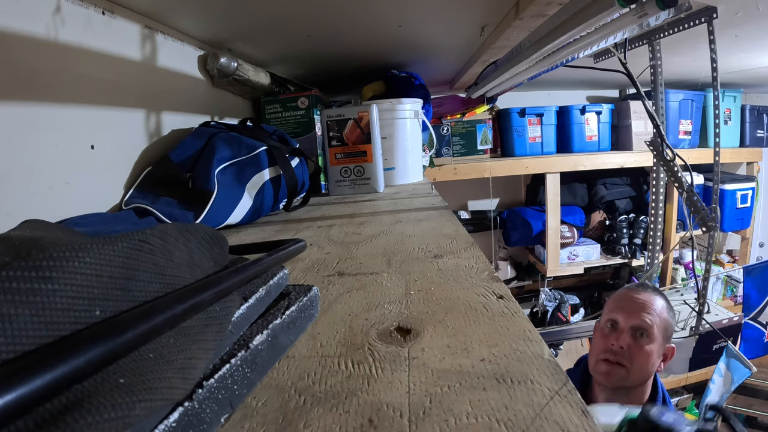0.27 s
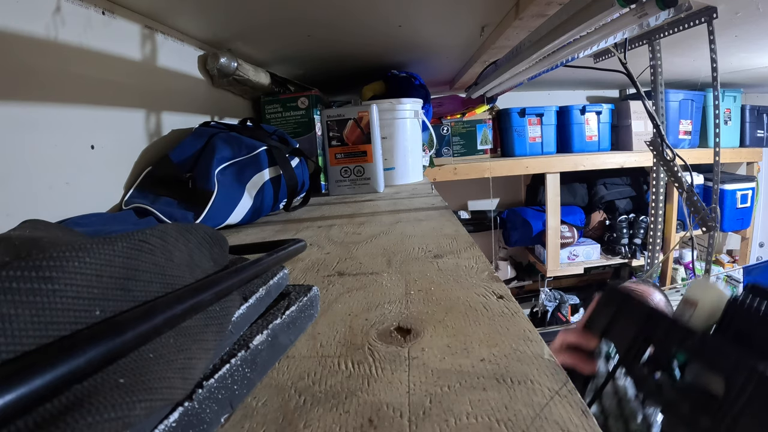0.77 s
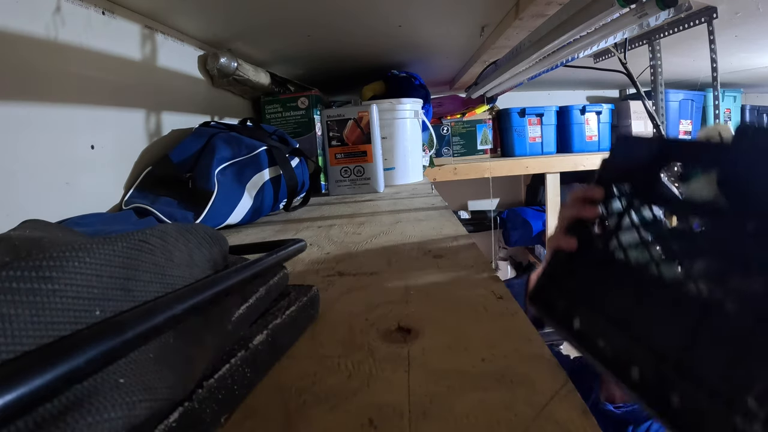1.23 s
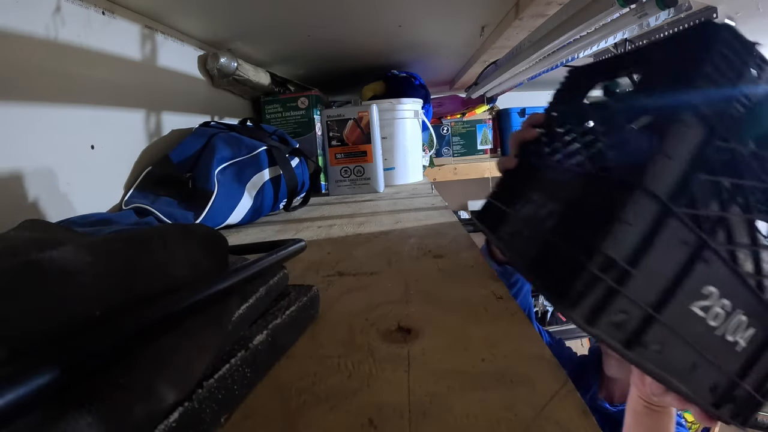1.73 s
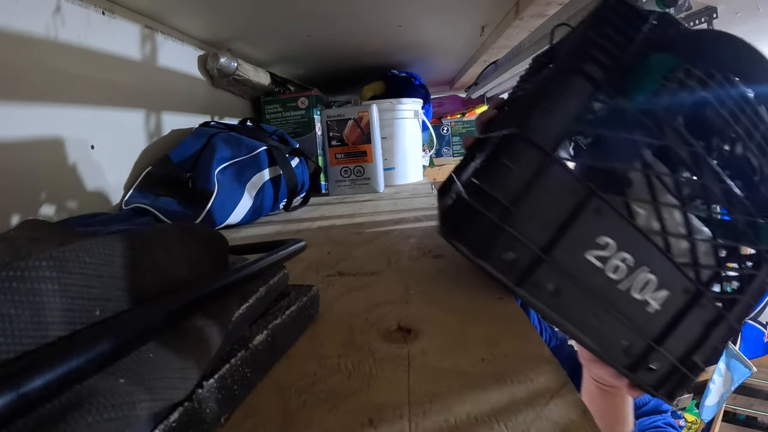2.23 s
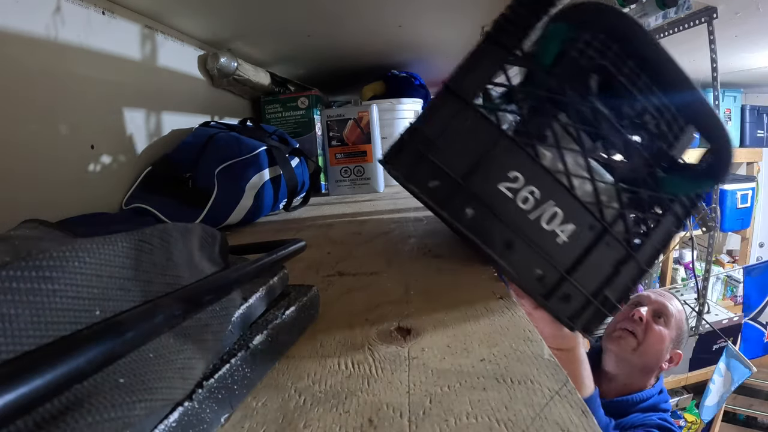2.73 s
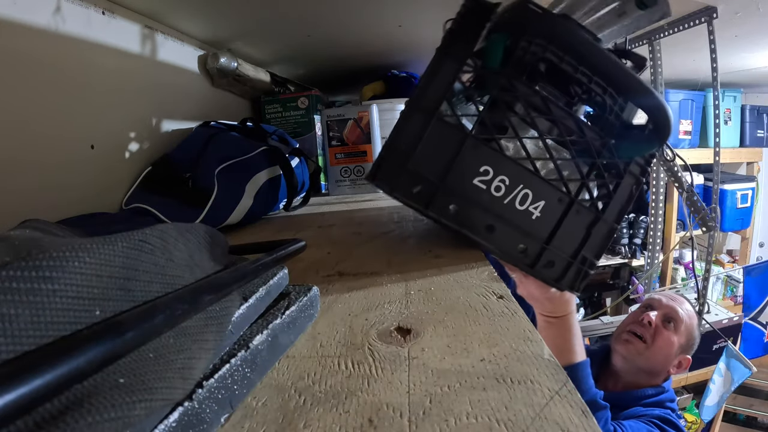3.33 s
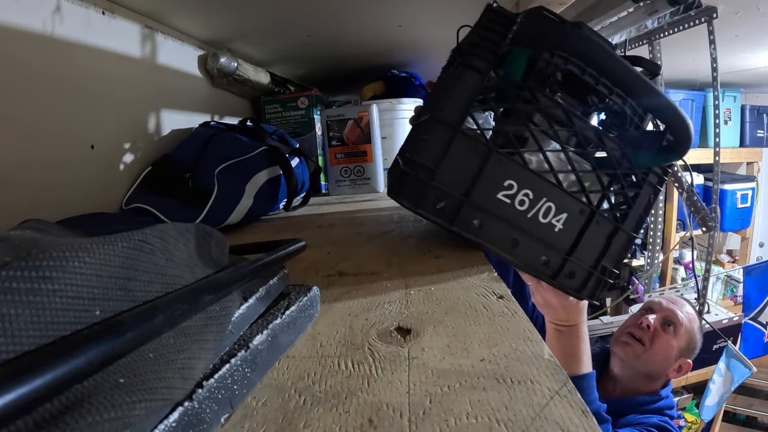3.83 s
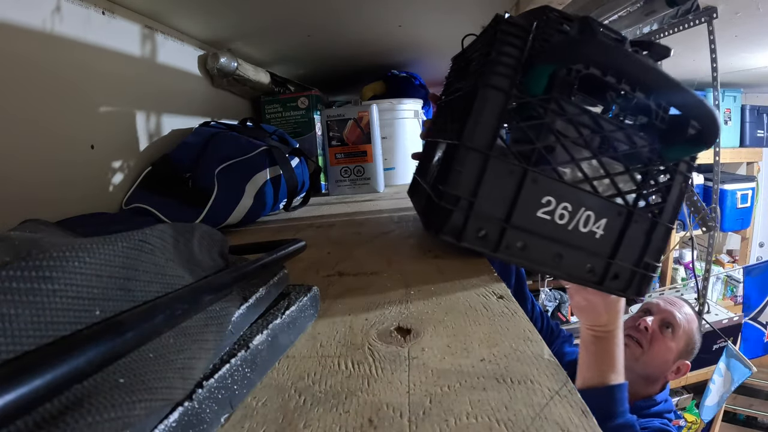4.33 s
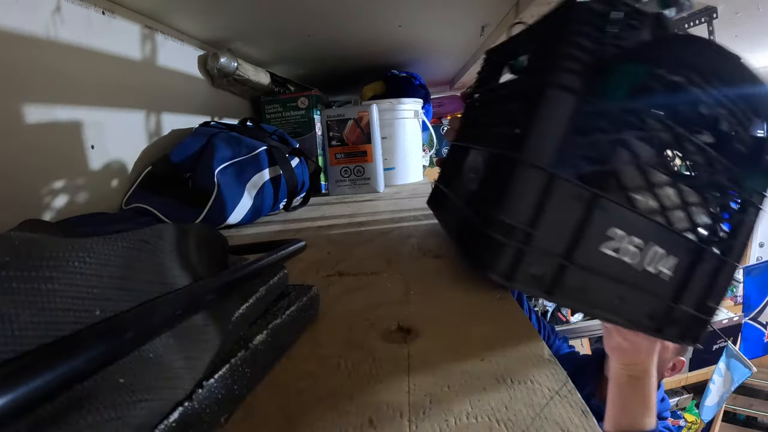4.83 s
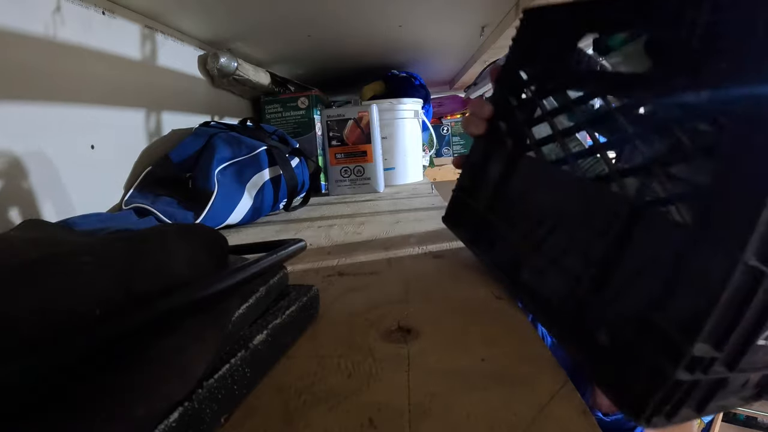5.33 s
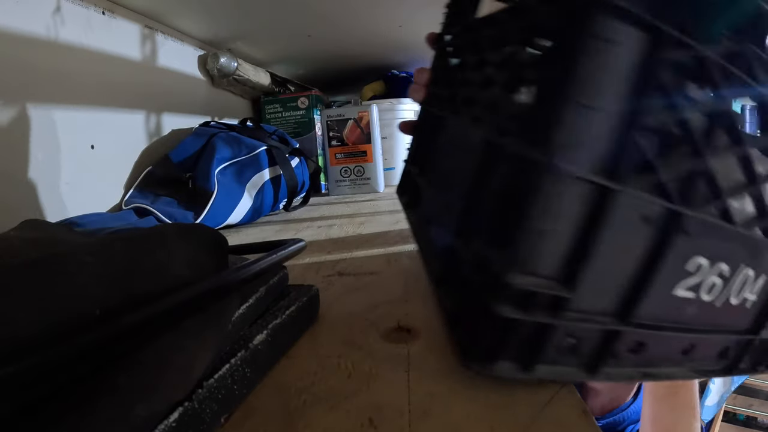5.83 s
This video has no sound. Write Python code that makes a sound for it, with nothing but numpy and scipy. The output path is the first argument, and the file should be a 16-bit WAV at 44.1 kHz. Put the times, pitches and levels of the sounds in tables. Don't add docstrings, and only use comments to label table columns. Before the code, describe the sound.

In a small garage, a loaded plastic crate is lifted with faint shuffling and small ticks from its contents. It bumps onto a plywood shelf, then drags along the wood in rough, stuttering scrapes with hollow panel booms, creaks and sharp snaps. The dragging grows loud, ends in heavy low knocks, and the crate rocks and settles almost quietly. The microphone lies close on the same board, so thumps are deep and solid.

```python
import sys
import numpy as np
from scipy import signal
from scipy.fft import rfft, irfft, next_fast_len
from scipy.io import wavfile
from scipy.ndimage import uniform_filter1d, map_coordinates

SR = 44100
rng = np.random.default_rng(int(sys.argv[2]) if len(sys.argv) > 2 else 0)


def digitize_waveform(pressure):
    field = np.atleast_2d(pressure).T
    bounded = np.clip(field, -1, 1)
    quanta = np.round(bounded * 32767).astype(np.int16)
    wavfile.write(sys.argv[1], SR, quanta)


def nominal_scale(level):
    x = np.asarray(level, float) / 20
    return 10 ** x


N = 268569


def unit(x):
    return x / np.sqrt(np.mean(x ** 2) + 1e-20)


def along(points, hz):
    f, v = np.transpose(points)
    return np.interp(np.log(hz + 1), np.log(f + 1), v)


def curves(rows):
    s, *columns = np.transpose(rows)
    t = np.arange(N) / SR
    return [np.interp(t, s, column, -120, -120) for column in columns]


def wobble(rate):
    knots = rng.standard_normal(int(N / SR * 400))
    return map_coordinates(knots, [np.arange(N) * rate / SR])


def filtered(x, response):
    m = next_fast_len(x.shape[-1] + SR // 4)
    return irfft(rfft(x, m) * response(np.fft.rfftfreq(m, 1 / SR)), m)[..., :x.shape[-1]]


def body(force, modes):
    def ring(f):
        total = 0
        for k, (centre, width, db) in enumerate(modes):
            damping = 1j * f * width
            total = total + (-1) ** k * nominal_scale(db) * damping / (centre * centre - f * f + damping)
        return total
    scale = np.sqrt(np.mean(np.abs(ring(np.linspace(0, SR / 2, 8192))) ** 2))
    return filtered(force, ring) / scale


def loaded(force, modes, centre_hz, octaves):
    share = []
    for hz, _, db in modes:
        distance = np.log2(hz / centre_hz) / octaves
        share.append(nominal_scale(db) * (0.13 + np.exp(-distance ** 2)))
    total = np.sqrt(np.sum(np.square(share), axis=0))
    return sum(body(force * g / total, [(hz, w, 0)]) for g, (hz, w, _) in zip(share, modes))


def add_at(out, start_s, sound):
    out[round(start_s * SR):][:len(sound)] += sound


def swings(rows, rise_s):
    out, t = np.zeros(N + SR), np.arange(SR // 4) / SR
    for s, db, hz, t60_ms in rows:
        shape = (1 - np.exp(-t / rise_s)) * nominal_scale(-60000 * t / t60_ms)
        add_at(out, s - .003, nominal_scale(db + 3.5) * shape * np.sin(2 * np.pi * hz * t))
    return out[:N]


# f/Hz, width/Hz, level/dB
LATTICE_MODES = [(635, 440, -10), (838, 48, 0), (1170, 232, -0.5), (1448, 353, 0.5), (1827, 408, 0),
                 (2409, 690, 2.5), (2639, 625, 3), (3760, 1180, -8.5)]
DUST_MODES = [(4477, 220, 3), (4560, 410, -0.5), (6300, 4100, -9.5), (11920, 1800, -14.5)]
PANEL_MODES = [(290, 33, 5), (430, 53, -63), (460, 46, -4.5), (542, 76, -7), (553.8, 17.4, -3.5)]
BOARD_MODES = [(62, 11, -29), (80.6, 7.7, 7), (98.8, 5, 8.5), (128.2, 13, -1), (165, 53, 2.5),
               (206, 44, -2), (242, 31, -2.5), (299.4, 9.5, 7.5)]


def crate():
    rasp, fizz, hum, rumble, board_hz = forces()
    grain = patchy(grit(spread_db=2.0, clump_db=2.0, clump_rate=130), depth_db=2.8)
    airborne = body(rasp * grain, LATTICE_MODES) + body(fizz * grain, DUST_MODES)
    airborne += ribs()
    airborne += ticks()
    airborne += nominal_scale(-9.5) * rasp * snags(rate=450, cycles=7.4, spread_db=6.5)
    panel_force = hum * grit(spread_db=2.5, clump_db=2.2, clump_rate=54)
    airborne += loaded(panel_force, PANEL_MODES, centre_hz=478, octaves=.22)
    airborne += judder()
    board_force = rumble * grit(spread_db=1.5, clump_db=3.0, clump_rate=37)
    board = loaded(board_force, BOARD_MODES, board_hz, octaves=0.75) + thumps()
    airborne += booms() + taps() + rub()
    return airborne, board


# t/s, speed as rasp level/dB,
# weight on the feet level/dB, contact place [0 mid-span - 1 near a brace]
LIFT = [
    (0.0, -56.5, -6.5, 0.71),
    (0.08, -63, -4, 0.92),
    (0.16, -54, -14, 0.75),
    (0.25, -65, 1, 0.58),
    (0.33, -53, -8.5, 0.78),
    (0.86, -59.5, -13.5, 0.88),
    (1.1, -56.5, -7.5, 0.56),
    (1.3, -68.5, -2, 0.68),
    (1.66, -69.5, -2, 0.23),
        (1.77, -73, 2, .3),
    (1.79, -63.5, -5, .3),
    (1.86, -64, -3, .3),
    (1.89, -65, 4, .3),
]
LANDING = [
    (1.91, -59, -4, 0.42),
    (2.03, -64, 17.5, 0.25),
    (2.1, -72, 13, 0.28),
    (2.3, -64, 17, 0.14),
    (2.39, -50.5, 16, 0.6),
    (2.43, -55, 8, 0.25),
    (2.49, -66, 24, 0.16),
]
FIRST_PUSH = [
    (2.55, -47, 1, 0.66),
    (2.66, -36, -4.5, 0.55),
    (2.75, -45.5, 1, 0.34),
    (2.97, -35.5, -1.5, 0.48),
    (3.04, -41, 0.5, 0.5),
    (3.26, -39, 5, 0.69),
    (3.36, -33, -5.5, 0.38),
    (3.46, -44, -7.5, 0.99),
]
LURCH = [
    (3.539, -25.5, -11, 0.92),
    (3.588, -30, -11, 0.77),
    (3.61, -23.5, -16, 0.63),
    (3.66, -26, -23, 0.84),
    (3.69, -34, -8.5, 0.54),
    (3.76, -37, 2.5, 0.41),
    (3.869, -47.5, -2, 0.22),
    (3.908, -45, 2, .3),
    (3.925, -39, -1.5, 0.37),
]
LAST_PUSH = [
    (4.0, -33.5, -6.5, 0.35),
    (4.16, -42, -4, 0.11),
    (4.27, -36, 0.5, 0.53),
    (4.45, -30, -9, 0.8),
    (4.56, -33.5, -4.5, 0.42),
    (4.69, -29, -7, 0.67),
    (4.82, -35.5, 4.5, 0.27),
    (4.99, -30.5, -1, 0.71),
    (5.11, -47.5, 0, 0.2),
]
TIPPING = [
    (5.13, -55, 6, .3),
    (5.16, -50, 4, .4),
    (5.185, -53, 6, .4),
    (5.197, -41, 5.7, .5),
]
SETTLE = [
    (5.211, -43.5, 6, 0.62),
    (5.289, -68, 15, 0.18),
    (5.43, -70.5, 16, 0.086),
    (5.63, -67, 14.5, 0.046),
    (5.72, -68.5, 10.5, .05),
    (5.78, -57.5, 6, 0.84),
    (5.87, -62, 14, 0.074),
    (5.95, -58, 0, 0.034),
    (6.09, -47, -1, 0.17),
]


def motion():
    hands = LIFT + LANDING + FIRST_PUSH + LURCH + LAST_PUSH + TIPPING + SETTLE
    rasp_db, weight_db, place = curves(sorted(hands))
    t = np.arange(N) / SR
    lifted = t < LANDING[0][0]
    sliding = t > FIRST_PUSH[0][0]
    rocking = t > LAST_PUSH[-1][0]
    braced = (t > 4.93) * (t < 5.99)
    fizz_db = 1.065 * (rasp_db + 41) - 53.5 + 5 * lifted
    fizz_db = fizz_db - 0.29 * np.maximum(weight_db, 0) - 14 * braced
    hum_db = rasp_db + 1.15 * weight_db - 1.5 - 2.5 * lifted
    hum_db = hum_db - 11 * rocking - 22 * ~(lifted | sliding)
    rumble_db = rasp_db + weight_db - 2 + 3 * lifted
    board_hz = 100 * 2 ** (1.61 * np.clip(place, 0, 1))
    return rasp_db, fizz_db, hum_db, rumble_db, board_hz


# t/s, peak level/dB, ringing rib f/Hz, board level/dB, contact time/ms
BUMPS = [(1.9026, -20.5, 1220, -10, 38), (1.987, -31, 2280, -2, 49), (2.239, -34, 1170, 8.5, 28),
         (2.339, -24.5, 1190, -3, 47), (2.434, -16, 1220, -5.5, 17.4), (2.456, -24.5, 1190, 4, 31),
         (2.481, -30, 1540, -3, 18), (2.511, -24, 1290, -1, 32), (2.621, -28.5, 1170, 6.5, 33),
         (2.652, -16.5, 1240, -8, 4.5), (2.702, -24.5, 1170, -4, 85), (5.01, -16.5, 1710, 0.5, 6),
         (5.037, -25.5, 1170, -3, 14), (5.143, -33, 1160, -11, 9.1), (5.173, -30, 1410, -20, 34),
         (5.241, -31, 956, 13.5, 13), (5.302, -51, 1200, 4, 41), (5.459, -22.5, 2303, -4.5, 22.4),
         (5.55, -33, 1900, -18, 14.4), (5.741, -44, 1480, -13, 30), (5.787, -27.5, 1260, -3.5, 47),
         (5.92, -32, 1840, 0.5, 50), (6.008, -34, 1310, -7.5, 42)]
# t/s, peak level/dB, ringing rib f/Hz, panel level/dB, contact time/ms
SLIPS = [(2.868, -34.5, 1200, 8, 22), (2.899, -21.5, 2160, -3, 21), (3.094, -24, 1200, 1, 61),
         (3.322, -16.5, 1900, -16, 33), (3.426, -23.5, 1300, -32, 66), (3.545, -17, 1130, -8, 38),
         (3.599, -14.5, 900, -15.5, 92), (3.64, -18.5, 1700, -24, 16), (3.916, -34.5, 820, 4, 38),
         (4.072, -25.5, 790, 4, 5.5), (4.258, -20, 1130, -16, 19), (4.338, -36, 1370, -14, 8),
         (4.374, -15.5, 1350, -18, 61), (4.574, -30.5, 1130, 4, 49), (4.661, -18.5, 1350, -7, 37),
         (4.691, -12.5, 1360, -12, 33), (4.75, -19, 1260, -2.5, 21), (4.806, -11.5, 970, -30, 25),
         (4.833, -11.5, 895, -15, 16), (4.861, -13.5, 1470, -25, 51)]


def contacts(db, bite_s, fall_s):
    force, t = np.zeros(N + SR), np.arange(SR // 4) / SR
    for (s, *_, hold_ms), level in zip(BUMPS + SLIPS, db):
        released = np.maximum(t - hold_ms / 1000, 0)
        shape = (1 - np.exp(-t / bite_s)) * nominal_scale(-60 * released / fall_s - 60 * t / .5)
        add_at(force, s - .003, (nominal_scale(level) * shape) ** 2)
    return np.sqrt(force[:N])


def forces():
    rasp_db, fizz_db, hum_db, rumble_db, board_hz = motion()
    s, peak_db, _, share_db, _ = np.transpose(BUMPS + SLIPS)
    bump = np.arange(len(peak_db)) < len(BUMPS)
    panel_db = peak_db + np.where(bump, -12.5 - 5.5 * (s > SETTLE[1][0]), share_db)
    board_db = peak_db + np.where(bump, share_db, -17.5)
    surge = .7 * np.tanh(wobble(22))
    slips = contacts(peak_db - 10.5, bite_s=0.0035, fall_s=0.072)
    bright_slips = nominal_scale(-8.5) * slips * (slips / nominal_scale(-31.5)) ** 0.19
    panel_hits = contacts(panel_db - 6.5, bite_s=0.0064, fall_s=0.12)
    board_hits = contacts(board_db - 6.0, bite_s=0.005, fall_s=0.16)
    rasp = np.hypot(nominal_scale(rasp_db + 2.54 * surge), slips)
    fizz = np.hypot(nominal_scale(fizz_db + 0.98 * surge), bright_slips)
    hum = np.hypot(nominal_scale(hum_db + 1.1 * surge), panel_hits)
    rumble = np.hypot(nominal_scale(rumble_db + 0.87 * surge), board_hits)
    return rasp, fizz, hum, rumble, board_hz


def grit(spread_db, clump_db, clump_rate):
    sizes = nominal_scale(spread_db * rng.exponential(size=N) + clump_db * wobble(clump_rate))
    return unit(rng.standard_normal(N) * sizes)


def patchy(x, depth_db):
    z = signal.stft(x, nperseg=768)[2]
    field = uniform_filter1d(rng.standard_normal(z.shape), size=2, axis=0)
    field = uniform_filter1d(field, size=5, axis=1)
    return unit(signal.istft(z * nominal_scale(depth_db * unit(field)), nperseg=768)[1][:N])


def snags(rate, cycles, spread_db):
    when, pitch, size = rng.random((4000, 3))[:int(rate * N / SR)].T
    hz = (1400 * 2 ** (1.9 * pitch))[:, None]
    t = np.arange(SR // 50) / SR
    level = nominal_scale(-spread_db * np.log(size + 0.027))[:, None] * 1000 / hz
    rings = level * np.sin(2 * np.pi * hz * t) * np.exp(-t * hz / cycles)
    place = (when * N).astype(int)[:, None] + np.arange(len(t))
    return unit(np.bincount(place.ravel(), rings.ravel(), N + SR)[:N])


def ribs():
    out, t = np.zeros(N + SR), np.arange(SR // 8) / SR
    for s, db, hz, *_ in BUMPS + SLIPS:
        noise = rng.standard_normal((2, len(t)))
        ring = body(noise[0] * nominal_scale(-60 * t / 0.068), [(hz, 60, 0)])
        crack = 0.47 * body(noise[1] * nominal_scale(-60 * t / 0.049), LATTICE_MODES)
        add_at(out, s - .003, nominal_scale(db - 12.0) * (ring + crack))
    return out[:N]


# t/s, level/dB, pressed share [0-1]
JUDDER = [
    (3.53, -52, 1),
    (3.585, -32, 0.7),
    (3.6, -19.5, 0.81),
    (3.625, -23.5, 0.8),
    (3.65, -28.5, 0.2),
    (3.675, -38, 0),
    (3.7, -39, 0.5),
    (3.73, -60, 0.2),
]
# f/Hz, width/Hz, level/dB
PRESSED_MODES = [(869, 30, 4.5), (1044, 26, -20), (1820, 23, -1), (2140, 47, -4), (2650, 35, -17)]
EASED_MODES = [(395.4, 20, 1), (822, 15, 3.5), (1290, 77, -9), (1624, 49, -3)]


def judder():
    judder_db, pressed = curves(JUDDER)
    pressed = np.clip(pressed, 0, 1)
    force = nominal_scale(judder_db + 5.5) * grit(spread_db=1.0, clump_db=5.5, clump_rate=77)
    return body(force * np.sqrt(pressed), PRESSED_MODES) + body(force * np.sqrt(1 - pressed), EASED_MODES)


# t/s, peak
# level/dB, f/Hz, t60/ms
THUMPS = [(0.204, -42.5, 202, 67), (0.208, -50.5, 112, 77), (0.33, -44.5, 104, 110), (1.05, -55, 98, 120),
          (1.93, -26, 155, 100), (2.24, -33.5, 290, 180), (2.285, -31, 84, 71), (2.365, -22.5, 222, 92),
          (2.45, -21, 119.5, 86), (2.478, -28, 87, 86), (2.632, -20.5, 85, 100), (2.94, -21.5, 117, 70),
          (2.985, -33, 206, 73), (3.328, -24, 295.5, 140), (3.552, -26.5, 315, 160),
          (3.995, -31.5, 132, 140), (4.085, -29, 129, 120), (4.245, -31, 122.8, 230),
          (4.812, -27, 301, 310), (4.868, -22, 125, 110), (4.965, -19.5, 129.6, 124),
          (4.98, -19.5, 241, 174), (5.008, -15.5, 165, 81), (5.036, -11.5, 145, 58),
          (5.243, -18.5, 117, 58), (5.461, -25, 141, 69), (5.495, -25.5, 100, 114), (5.8, -38, 269, 120),
          (5.82, -42, 110, 150), (5.83, -42, 300, 100), (5.875, -42, 100, 200), (5.945, -44, 105, 150),
          (6.02, -52, 147.6, 120), (1.99, -41, 130, 150), (3.44, -41, 60, 180)]


def thumps():
    return swings(THUMPS, rise_s=0.0044)


# t/s, peak level/dB, f/Hz
BOOMS = [(2.249, -29.5, 457), (2.346, -26.5, 529), (2.442, -16, 549), (2.517, -27, 460),
         (2.615, -20.5, 446), (2.693, -22, 538), (2.739, -21.5, 472), (3.137, -22, 485), (3.193, -29, 440),
         (3.241, -18, 464), (3.543, -22, 619), (3.576, -24, 460), (3.612, -33, 410), (4.582, -20, 472),
         (4.684, -12, 460), (4.718, -11, 510), (4.759, -10.5, 453), (4.855, -12.5, 540),
         (4.927, -13.5, 470), (4.969, -16.5, 544), (5.195, -24, 460), (5.739, -38, 600),
         (5.792, -28.5, 396)]


def booms():
    return swings([(*row, 70) for row in BOOMS], rise_s=0.0064)


# t/s, peak level/dB, f/Hz, t60/ms
TAPS = [(1.006, -47, 1920, 40), (1.006, -51, 3300, 40), (2.439, -27, 1230, 40), (2.486, -30, 1500, 40),
        (2.486, -34, 2900, 30), (4.258, -32, 1150, 57), (4.338, -29, 1380, 50), (4.374, -23, 1400, 40),
        (4.386, -27, 2000, 40), (4.392, -30, 1180, 55), (4.58, -32, 2180, 99), (5.765, -45, 1450, 43),
        (5.788, -29.5, 1200, 38), (5.797, -34.5, 1910, 40), (5.805, -35, 1300, 40), (5.82, -37, 1050, 38),
        (5.836, -41, 1350, 44), (5.915, -45, 1300, 40), (5.955, -49, 950, 50), (6.006, -48, 2750, 60),
        (6.04, -44, 1310, 50), (6.07, -43, 1250, 60)]


def taps():
    return swings(TAPS, rise_s=0.00081)


# t/s, length/s, level/dB, first f/Hz, last f/Hz
SINGS = [(2.6, 0.173, -45.5, 420, 500), (2.881, 0.11, -51, 580, 540), (3.06, 0.13, -35, 500, 480),
         (3.18, 0.18, -36, 470, 450), (3.235, .085, -34, 550, 590), (3.329, .08, -40, 600, 640),
         (3.4, 0.098, -41.5, 470, 493), (3.743, 0.078, -47, 600, 610), (3.914, 0.07, -38, 570, 554),
         (4.015, 0.08, -39, 570, 620), (3.998, 0.092, -46, 450, 450), (3.95, 0.102, -44, 1800, 1700),
         (4.27, 0.096, -43, 1150, 1300), (4.363, 0.11, -40, 1500, 1400), (4.35, 0.07, -34.5, 600, 560),
         (4.456, 0.084, -39, 430, 430), (4.461, 0.091, -41, 1400, 1350), (4.67, 0.099, -48, 450, 490),
         (4.73, 0.094, -28.5, 450, 536), (4.92, 0.13, -36.5, 520, 530), (5.13, 0.12, -56.5, 870, 870),
         (5.789, 0.1, -50, 400, 298), (6.05, .04, -51, 1300, 1350), (1.919, 0.109, -50, 420, 188),
         (3.592, 0.044, -24.5, 880, 860), (3.635, 0.039, -29.5, 840, 830), (3.685, 0.046, -33, 830, 815),
         (3.605, .065, -25.5, 405, 385), (3.592, .025, -27, 1815, 1810), (3.607, 0.023, -32, 2170, 2170),
         (3.597, .03, -32, 2700, 3000), (3.54, 0.033, -29, 1150, 1100), (3.5, 0.096, -38, 2200, 2180),
         (3.6, 0.054, -41, 200, 223), (5.785, .03, -43, 1200, 1100), (6.4, 0.027, -44.5, 1500, 1700),
         (5.238, 0.042, -38.5, 300, 216), (2.438, 0.036, -32.5, 1250, 1200), (4.77, .04, -34, 490, 525)]
# t/s, length/s, level/dB, f/Hz
HELD = [
    (6.02, .046, -40, 149),
    (3.56, .04, -31, 1050),
    (5, .04, -36, 1500),
    (4.47, .08, -40, 1600),
    (4.47, .05, -38, 1180),
]


def sings():
    out = np.zeros(N + SR)
    for s, length_s, db, first_hz, last_hz in SINGS + [(*row, row[-1]) for row in HELD]:
        knots = rng.standard_normal((2, 64))
        u = np.arange(int(length_s * SR)) / SR
        size, turn = (map_coordinates(k, [u * 46.6]) for k in knots)
        bend_hz = np.linspace(first_hz, last_hz, len(u))
        phase = 2 * np.pi * np.cumsum(bend_hz) / SR + 0.9 * turn
        swell = np.abs(np.sin(np.pi * u / u[-1])) ** 0.36
        add_at(out, s, nominal_scale(db + 1.5 + 3.3 * size) * swell * np.sin(phase))
    return out[:N]


# t/s, peak level/dB
SNAPS = [(0.7647, -39), (2.1464, -60), (2.347, -33), (2.3644, -23), (2.3796, -22), (2.5152, -30),
         (2.5676, -32), (2.612, -28), (2.765, -24), (2.9044, -33), (2.9894, -23), (3.2794, -21),
         (3.5139, -24.5), (3.911, -33), (3.9514, -30), (4.2494, -27), (4.337, -38), (4.369, -29),
         (4.3836, -12), (4.6877, -11), (4.8063, -21), (4.864, -22), (4.8986, -19), (4.9641, -31),
         (5.141, -43), (5.1701, -45), (5.1915, -23), (5.786, -44), (5.9694, -45), (6.01, -34),
         (6.0187, -28), (6.029, -29), (6.0394, -27), (6.048, -33), (1.787, -50), (1.8175, -40), (1.84, -50),
         (2.484, -28), (2.657, -25), (2.873, -30), (3.3325, -17), (4.373, -21), (4.927, -20), (4.836, -20),
         (1.985, -34)]


def snaps():
    force, t = np.zeros(N + SR), np.arange(SR // 20) / SR
    for s, db in SNAPS:
        add_at(force, s - .002, nominal_scale(db - 13.5 - 60 * t / 0.039) * rng.standard_normal(len(t)))
    return body(force[:N], LATTICE_MODES + DUST_MODES)


# t/s, peak level/dB, ring f/Hz, click level/dB, t60/ms
TICKS = [(0.171, -32, 1720, -14, 18), (0.204, -50.5, 1117, -9.5, 110), (0.329, -40.5, 2390, -10, 31),
         (0.356, -42, 1230, -6, 72), (0.539, -29.5, 1753, -26, 86), (0.693, -50.5, 2010, 4.5, 32),
         (0.764, -51.5, 1350, 2.5, 34), (0.934, -51.5, 840, -9, 170), (0.991, -37.5, 1117, -14, 75),
         (1.004, -32.5, 1457, -3.5, 43), (1.048, -51, 1200, -11, 60), (1.115, -32, 3200, -27, 13),
         (1.619, -51, 1840, -19, 36), (1.818, -46, 1680, -16, 30), (2.513, -37, 1290, -22, 66),
         (3.915, -27.5, 1050, -39, 50), (4.372, -28, 1324, -21, 62), (5.14, -32.5, 1120, -27, 50),
         (5.172, -31, 1540, -31, 28), (5.74, -30, 1444, -35, 42), (5.93, -28.5, 1900, -40, 33)]


def ticks():
    out, t = np.zeros(N + SR), np.arange(SR // 5) / SR
    for s, db, hz, click_db, t60_ms in TICKS:
        dying = (1 - np.exp(-t / 0.0013)) * nominal_scale(-60000 * t / t60_ms)
        noise = rng.standard_normal((3, len(t)))
        ring = (np.sin(2 * np.pi * hz * t) + .2 * np.sin(2 * np.pi * 1.54 * hz * t)) * dying
        rattle = 0.34 * body(noise[0] * dying, LATTICE_MODES)
        click = nominal_scale(click_db + 3.5) * body(noise[1] * dying, DUST_MODES)
        thud = nominal_scale(-67 - db) * body(noise[2] * nominal_scale(-60 * t / 0.25), BOARD_MODES)
        add_at(out, s - .002, nominal_scale(db + 0.5) * (ring + rattle + click + thud))
    return out[:N]


def rub():
    start_s, length_s, level_db = 2.14, 0.14, -56
    rise = [(start_s - .01, level_db - 7), (start_s + 0.0036, level_db)]
    rub_db, = curves(rise + [(start_s + length_s, level_db - 3)])
    return body(nominal_scale(rub_db) * rng.standard_normal(N), [(1350, 41, 0)])


# f/Hz, t60/s
GARAGE_T60 = [(100, 0.55), (1000, 0.21), (8000, 0.18)]


def garage(x):
    hz, t, z = signal.stft(rng.standard_normal(SR // 2), SR, nperseg=256)
    decay = nominal_scale(-60 * t / along(GARAGE_T60, hz)[:, None])
    tail = signal.istft(z * decay, SR, nperseg=256)[1]
    delayed = np.pad(x, (200, 0))
    return signal.fftconvolve(delayed, tail / np.linalg.norm(tail))[:N]


# f/Hz, spectral level/dB per Hz
HUSH = [(15, -3), (27, 14), (45, -11), (74, -15), (180, -16), (270, -4), (500, -6.5), (940, -8.5),
        (1330, -5), (1800, -13.5), (2400, -32), (14000, -27)]


def hush():
    air = filtered(rng.standard_normal(N), lambda hz: nominal_scale(along(HUSH, hz)))
    return nominal_scale(-62.0 + 1.3 * wobble(0.32)) * unit(air)


def scene():
    airborne, board = crate()
    room = nominal_scale(-10.5) * garage(airborne + 0.6 * board)
    sound = airborne + board + room + hush() + sings() + snaps()
    return np.array([sound, sound])


# f/Hz, level/dB
MICROPHONE = [(20, -30), (30, -4), (60, 0), (7000, -4.5), (8300, -16), (9800, -14.5), (13000, -11.5),
              (13800, -18), (14300, -28)]
# f/Hz, level/dB
PORTS = [(1000, -43), (2500, -31.5), (5000, -26), (7000, -22), (9500, -17), (11000, -14), (12000, 6.5),
         (14000, 8)]


def top_cut(x):
    return signal.sosfilt(signal.butter(12, 15080, fs=SR, output="sos"), x)


def record(dry):
    def housing(hz):
        offset_hz = hz - 9080
        return np.abs(offset_hz) / np.hypot(offset_hz, 370) * (hz < 15000)
    mid = filtered(dry[0], lambda hz: nominal_scale(along(MICROPHONE, hz)) * housing(hz))
    z = signal.stft(mid, nperseg=128)[2]
    random_phase = np.exp(2j * np.pi * rng.random(z.shape))
    other = signal.istft(z * random_phase, nperseg=128)[1][:N]
    side = filtered(other, lambda hz: nominal_scale(along(PORTS, hz) - 6.0) * housing(hz))
    return top_cut(np.array([mid + side, mid - side]))


dry = scene()
out = record(dry)
digitize_waveform(out)
```